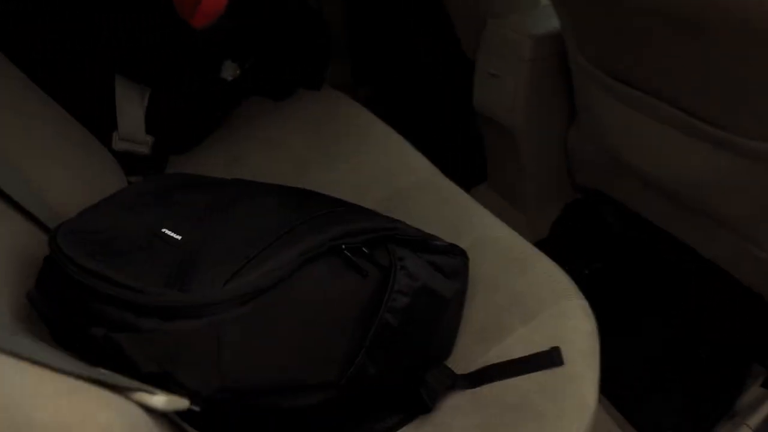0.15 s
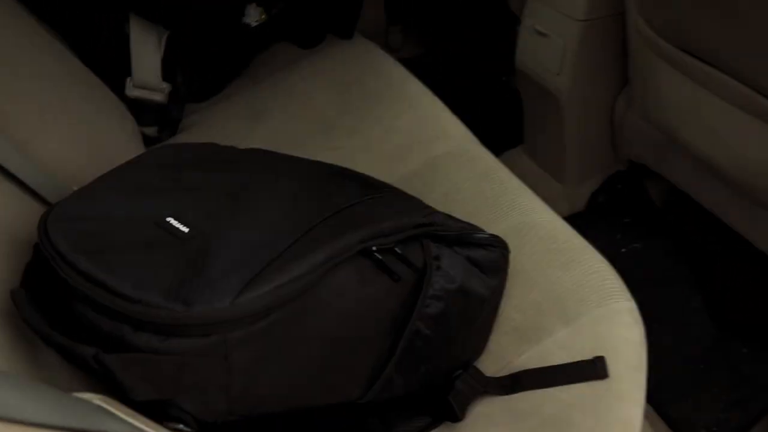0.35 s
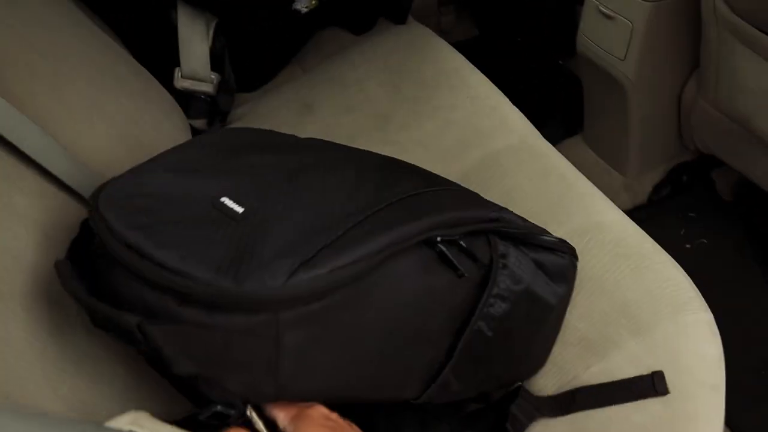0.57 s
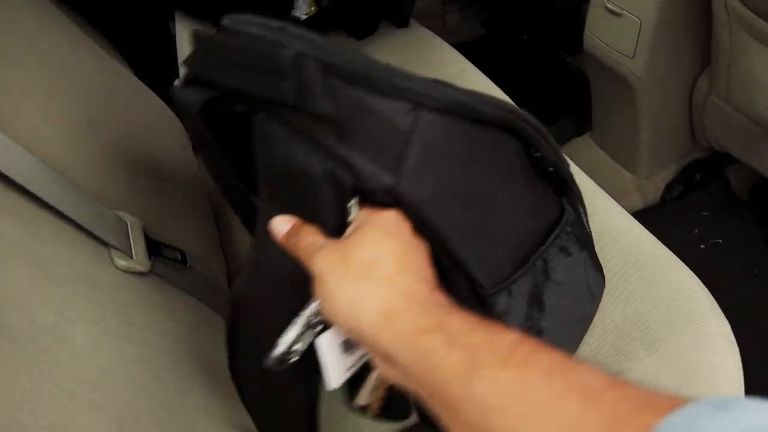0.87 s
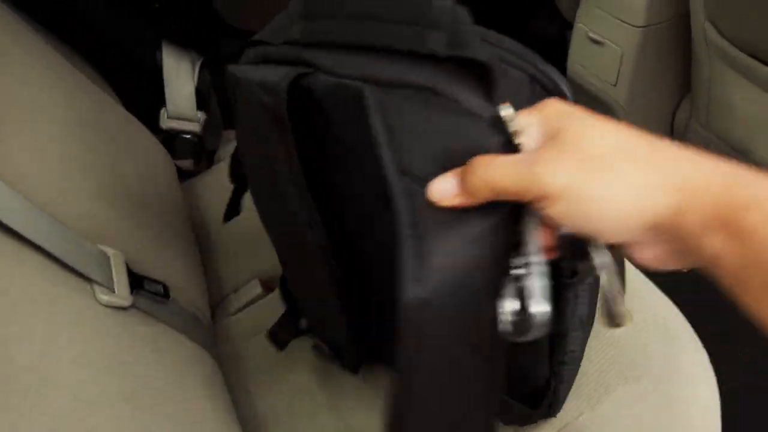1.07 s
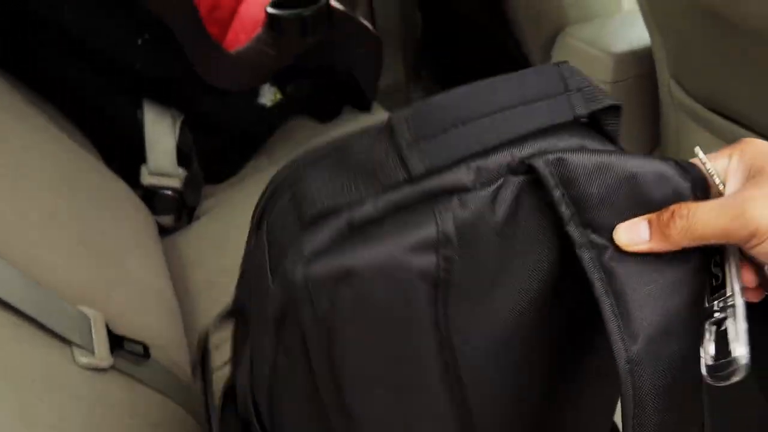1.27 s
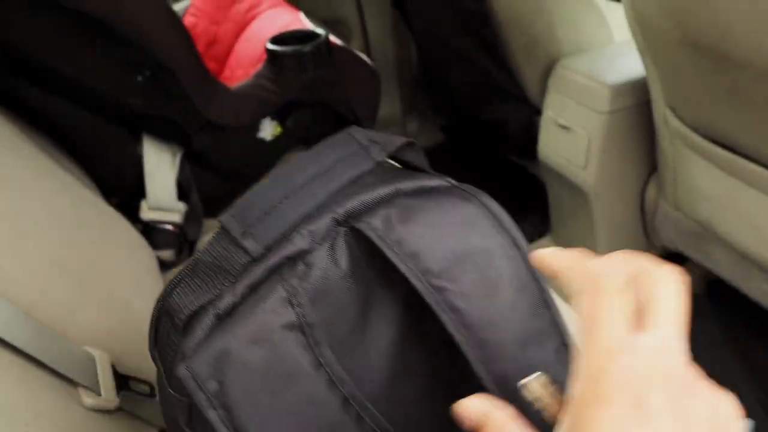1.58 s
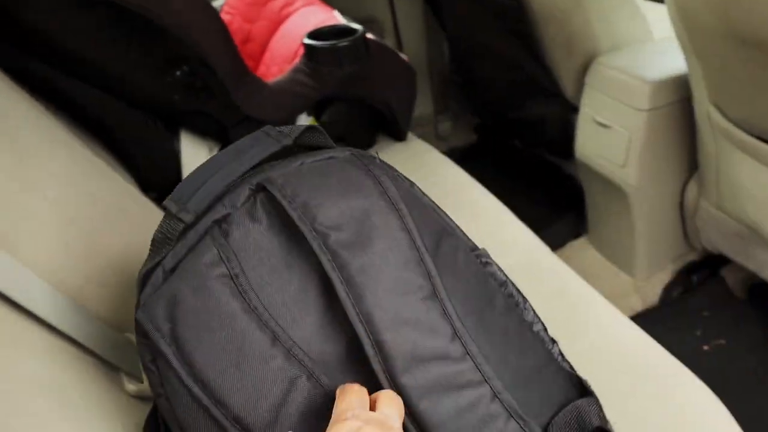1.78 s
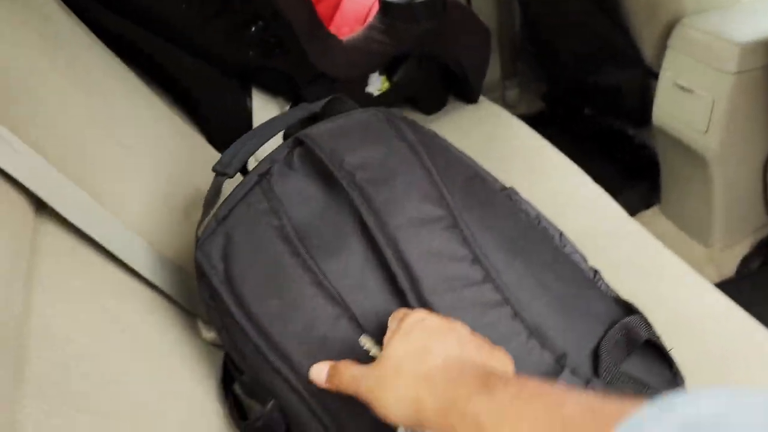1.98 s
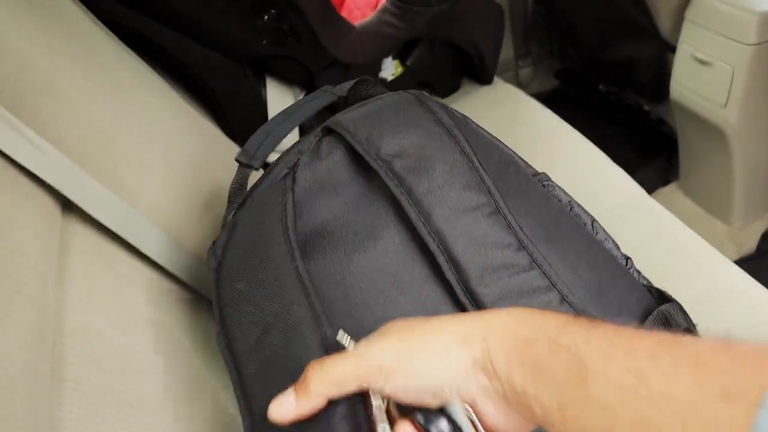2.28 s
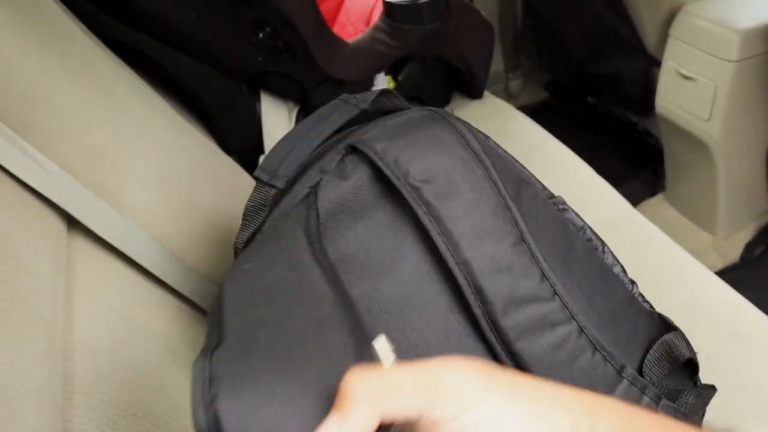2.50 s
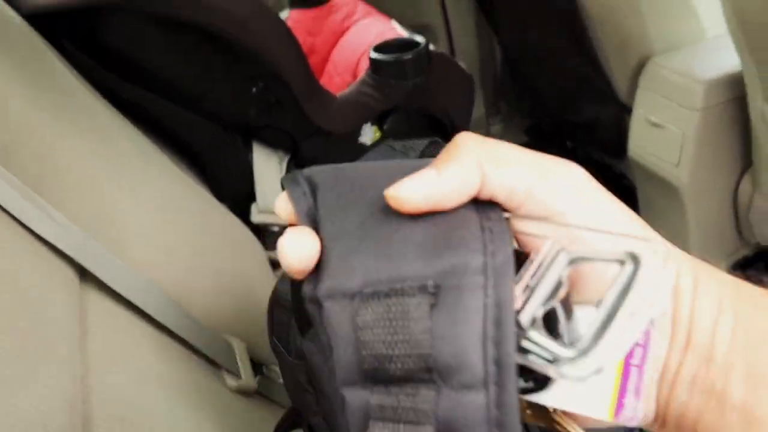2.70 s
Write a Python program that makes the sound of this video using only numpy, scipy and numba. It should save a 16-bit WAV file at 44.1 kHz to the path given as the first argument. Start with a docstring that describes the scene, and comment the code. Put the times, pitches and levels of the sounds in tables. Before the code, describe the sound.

A car door opens very close at 0.22 seconds: a loud, slightly clipped double clunk with bright latch rattle, then a short creak and lesser knocks until 0.7. Keys clack dryly from 0.8, with bright clinks near 1.6, 2.1 and 2.6. A nylon backpack rasps and swishes, bumping the seat around 0.95, 1.37 and 1.8-2.0, with a plastic tap at 1.88. Short dead cabin reflections, faint low outdoor air.

```python
"""Car door, keys and nylon bag

A car door unlatches with a sharp double clunk and creaks open, close to the microphone, outdoors.
A hand that holds a bunch of keys drags a nylon backpack over the seat: keys clink and clack,
damped by the fingers, cloth swishes and crinkles, the bag bumps softly. Hits are decaying modes and
noise bursts, the creak is stick-slip pulses through resonances, cloth and outdoor air are shaped noise."""
import sys
import numpy as np
from scipy import signal
from scipy.fft import rfft, irfft
from scipy.io import wavfile
from scipy.ndimage import uniform_filter1d
from numba import njit

SR = 44100
rng = np.random.default_rng(int(sys.argv[2]) if len(sys.argv) > 2 else 0)


def wav_record(signal):
    """Record a signal, one row per channel, as 16-bit PCM in the file named by sys.argv[1]."""
    frames = np.transpose(np.atleast_2d(signal))
    bounded = np.clip(frames, -1, 1)
    # unit amplitude maps onto the largest positive 16-bit level
    quanta = np.round(bounded * 32767).astype(np.int16)
    wavfile.write(sys.argv[1], SR, quanta)


N = 125685
T = np.arange(N) / SR
HIT_T = T[:SR // 5]  # time within one hit, s


def undb(db):
    """Decibels to gain."""
    return 10 ** (np.asarray(db) / 20)


def unit(x):
    """Scale to rms 1."""
    return x / np.sqrt(np.mean(x ** 2) + 1e-18)


def noise(count=N):
    """White noise."""
    return rng.standard_normal(count)


def curve(rows, axis=1):
    """One column of a table, joined by straight lines in time."""
    rows = np.array(rows)
    return np.interp(T, rows[:, 0], rows[:, axis])


def add(out, at, x):
    """Mix a sound in at a time in seconds."""
    i = max(int(at * SR), 0)
    out[i:i + len(x)] += x[:max(N - i, 0)]


def colour(x, points, tilt_db=0):
    """Give a noise a spectrum and a tilt in dB per octave above 1 kHz; rms 1."""
    hz, db = np.array(points).T
    f = np.fft.rfftfreq(len(x), 1 / SR) + 1
    octaves = np.log2(np.maximum(f / 1000, 1))
    gain_db = np.interp(np.log(f), np.log(hz), db) + tilt_db * octaves
    return unit(irfft(rfft(x) * undb(gain_db), len(x)))


def fade(t60):
    """Exponential decay of a hit, by 60 dB in t60 seconds."""
    return np.exp(-np.log(1000) * HIT_T / max(t60, 1e-3))


def burst(points, t60, tilt_db=0):
    """Dense, quickly dying vibration of a contact."""
    return colour(noise(len(HIT_T)), points, tilt_db) * fade(t60)


def ring(modes, ratio=1, tilt_db=0):
    """Struck modes as decaying sines, tilted in dB per octave about the strongest one."""
    main_hz = max(modes, key=lambda m: m[1])[0]
    out = np.zeros(len(HIT_T))
    for hz, db, t60 in modes:
        level = undb(db + tilt_db * np.log2(hz / main_hz))
        out += level * np.sin(2 * np.pi * hz * ratio * HIT_T) * fade(t60)
    return out


def walk(rate):
    """Smooth random wander, rms 1, with a new target at the given rate per second."""
    k = int(SR / rate)
    steps = np.repeat(noise(N // k + 1), k)
    return unit(uniform_filter1d(steps, k)[:N])


@njit
def resonate(x, hz, width):
    """Band-pass with a moving centre."""
    y, b, l = np.empty(len(x)), 0., 0.  # output, band and low-pass states
    for i in range(len(x)):
        g, k = np.tan(np.pi * hz[i] / SR), width / hz[i]
        v = (b + g * (x[i] + 1e-18 - l)) / (1 + g * (g + k))
        b, l, y[i] = 2 * v - b, l + 2 * g * v, k * v
    return y


def band(x, hz, width):
    """A resonance applied twice, for steep sides; the centre may move."""
    centre = np.ones(len(x)) * hz
    return resonate(resonate(x, centre, width), centre, width)


# Spectrum of the open air. Each row: frequency in Hz, level in dB.
AIR_COLOUR = [(18, -39), (30, -24), (92, 1.5), (472, -8.5), (1200, -7.5), (15000, -33)]
AIR_DB = -48.5


def outdoor_air():
    """Steady outdoor background: noise that is strongest in the bass."""
    return undb(AIR_DB) * colour(noise(), AIR_COLOUR)


CABIN_DB, CABIN_T60_S = -13, 0.063


def cabin(near):
    """Short, dead reflections of the cabin: the sources smeared by a fading noise tail."""
    tail = noise(len(HIT_T)) * fade(CABIN_T60_S) * (HIT_T > .002)
    return undb(CABIN_DB) * signal.fftconvolve(near, tail / np.linalg.norm(tail))[:N]


# Level of the bag's low shuffling. Each row: time in seconds, level in dB.
SHUFFLE = [(.21, -68), (.24, -34.5), (.8, -45.5), (.97, -38.5), (1.14, -49), (1.32, -40.5), (1.38, -27),
           (1.44, -40.5), (1.76, -45.5), (1.88, -32), (2.16, -40.5), (2.56, -38), (2.85, -46)]
# Its spectrum. Each row: frequency in Hz, level in dB.
SHUFFLE_COLOUR = [(25, -40), (50, -12.5), (85, -1.5), (200, -5.5), (350, -14.5), (2000, -50)]


def shuffle():
    """The bulk of the bag shuffles: low noise that follows the drag."""
    return colour(noise(), SHUFFLE_COLOUR) * undb(curve(SHUFFLE))


CRINKLE_RATE_PER_S = 1500  # rms of the uneven catch rate
CRINKLE_SPREAD_DB, CRINKLE_T60_S = 4, 0.0037
CRINKLE_SHARE = 0.53  # share of the friction's power


def friction():
    """Nylon threads catch in clusters of tiny crinkles, over a smooth hiss."""
    draw = rng.random(N)
    chance = unit(undb(5 * walk(40))) * CRINKLE_RATE_PER_S / SR
    catches = (draw < chance) * noise()
    catches *= undb(CRINKLE_SPREAD_DB * np.minimum(rng.exponential(size=N), 2.8))
    # each catch adds a decaying puff of power, filled with noise
    power = signal.fftconvolve(catches ** 2, fade(CRINKLE_T60_S) ** 2)[:N]
    crinkles = np.sqrt(np.abs(power)) * noise()
    return np.sqrt(CRINKLE_SHARE) * unit(crinkles) + np.sqrt(1 - CRINKLE_SHARE) * noise()


# Level of the nylon's rasp before its flutter. Each row: time in seconds, level in dB.
RASP = [(.43, -56), (.48, -42.5), (.72, -51.5), (.87, -52.5), (.93, -40), (1.06, -38), (1.11, -53),
        (1.24, -48), (1.30, -35.5), (1.38, -38), (1.54, -39.5), (1.61, -56.5), (1.775, -49), (1.81, -32.5),
        (1.875, -31), (1.93, -44.5), (2.0, -35), (2.22, -41), (2.49, -35.5), (2.65, -46), (2.78, -46.5),
        (2.85, -54)]
# Level of the fine hiss of sliding cloth. Each row: time in seconds, level in dB.
SWISH = [(.44, -62), (.48, -46), (.78, -49), (1.05, -43.5), (1.11, -58.5), (1.45, -48), (1.49, -41),
         (1.55, -38.5), (1.60, -65), (1.77, -56.5), (1.82, -38), (1.88, -35.5), (1.93, -52.5), (1.99, -43),
         (2.61, -48.5), (2.68, -39.5), (2.85, -64.5)]
# Spectra of the rasp and of the swish. Each row: frequency in Hz, level in dB.
RASP_COLOUR = [(150, -15), (500, 0.5), (1100, -1.5), (4100, 3), (5500, -7), (8000, -13), (12000, -25),
               (16000, -41)]
SWISH_COLOUR = [(1500, -21.5), (4000, -3), (12500, 2.5), (16000, 0)]
FLUTTER_DB = 2.03


def cloth():
    """The same nylon friction is heard as a fluttering rasp and as a bright swish."""
    rubbing = friction()
    rasp_db = curve(RASP) + FLUTTER_DB * walk(81)
    rasp = colour(rubbing, RASP_COLOUR) * undb(rasp_db) * (T > KNOCKS[0][0])
    swish = colour(rubbing, SWISH_COLOUR) * undb(curve(SWISH))
    return rasp + swish


# Fingers on the bag's padding. Each row: centre in seconds, level in dB, pitch in Hz.
RUBS = [(.93, -39, 337), (1.049, -44.5, 474), (1.891, -35.5, 430), (2.266, -35.5, 473), (2.5, -38.5, 520)]
RUB_SPREAD_S, RUB_WIDTH = 0.02, 0.6  # filter width as a share of the pitch


def finger_rubs():
    """Fingers rub the padding: narrow noise that swells and sinks."""
    out = np.zeros(N)
    for at, db, hz in RUBS:
        swell = np.exp(-.5 * ((T - at) / RUB_SPREAD_S) ** 2)
        out += undb(db) * unit(band(noise(), hz, RUB_WIDTH * hz)) * swell
    return out


# The bag bumps the seat. Each row: start in seconds, level in dB, pitch in Hz.
BUMPS = [(.945, -21, 140), (1.373, -11, 116.5), (1.791, -17.5, 171), (1.868, -21, 344), (1.895, -21, 267),
         (2.008, -24.5, 265), (2.068, -24.5, 163), (2.513, -27, 135)]
BUMP_T60_S, BUMP_ATTACK_S = 0.061, 0.004
BUMP_RUSTLE_DB, BUMP_WIDTH = -5, 1.5  # filter width as a multiple of the pitch


def bag_bumps():
    """The soft bag thuds on the seat: a low damped tone with a rustle and a blunt attack."""
    out = np.zeros(N)
    attack = np.minimum(HIT_T / BUMP_ATTACK_S, 1)
    for at, db, hz in BUMPS:
        thud = ring([(hz, 0, BUMP_T60_S)])
        rustle = unit(band(noise(len(HIT_T)), hz, BUMP_WIDTH * hz)) * fade(BUMP_T60_S)
        add(out, at, undb(db) * (thud + undb(BUMP_RUSTLE_DB) * rustle) * attack)
    return out


# Plastic buckles and the key tag. Each row: start in seconds, level in dB, pitch in Hz.
TAPS = [(1.0450, -17, 1700), (1.056, -21, 920), (1.3698, -17, 1310), (1.8809, -8.5, 2104),
        (2.4892, -23.5, 835), (2.7603, -21, 1480)]
# Modes of a plastic part. Each row: multiple of its pitch, level in dB, t60 in seconds.
PLASTIC = [(.72, -9.5, 0.014), (1, 0.5, 0.013)]
TAP_CRACK_DB = -11.5


def plastic_taps():
    """Plastic parts tap: two short modes and a crack of contact noise."""
    out = np.zeros(N)
    for at, db, hz in TAPS:
        crack = burst(CONTACT_COLOUR, PLASTIC[0][2], tilt_db=-2)
        add(out, at, undb(db) * (ring(PLASTIC, hz) + undb(TAP_CRACK_DB) * crack))
    return out


# Stick-slip of the opening door. Each row: time in seconds, slips per second before jitter,
# level in dB, resonance ratio.
CREAK = [(.31, 119, -59, 0.82), (.335, 118, -26, 0.92), (.40, 89, -34, 0.83), (.435, 90, -62, 0.67),
         (.48, 122, -34, 1.07), (.55, 170, -35.5, 0.87), (.632, 175, -27, 1.084), (.647, 108, -35, 0.99),
         (.665, 136, -26.5, 1.065), (.678, 125, -56, 1)]
# Resonances that the creak rings. Each row: frequency in Hz before the ratio, filter width in Hz,
# level in dB.
HINGE = [(463, 187, 8), (660, 183, 7.5), (810, 147, 10), (1250, 360, -1.5), (1800, 250, -5.5),
         (3900, 880, -9)]
SLIP_JITTER, SLIP_SPREAD_DB = .07, 2  # jitter as a share of the slip rate
SCUFF_S, SCUFF_DB = .0015, -19  # decay time constant, level


def creak():
    """Uneven slips, each with a short scuff, ring resonances that glide as the door swings."""
    rate = curve(CREAK) * np.exp(SLIP_JITTER * walk(150))
    phase = np.cumsum(rate) / SR
    slips = np.diff(np.floor(phase), prepend=0) * undb(SLIP_SPREAD_DB * noise())
    since_slip = (phase % 1) / rate
    scuff = undb(SCUFF_DB) * noise() * np.exp(-since_slip / SCUFF_S)
    ratio = curve(CREAK, axis=3)
    body = sum(undb(db) * band(slips + scuff, hz * ratio, width) for hz, width, db in HINGE)
    moving = (T > CREAK[0][0]) * (T < CREAK[-1][0])
    return unit(body) * undb(curve(CREAK, axis=2)) * moving


# Knocks in the door panel. Each row: start in seconds, level in dB, pitch ratio.
KNOCKS = [(0.2236, 0, 1.), (.2340, -5, 0.99), (0.2406, -7.5, 1.28), (0.3078, -3, 0.78), (.3210, -12, 1.2),
          (0.3998, -19, .7), (0.4685, -22.5, 1.24), (0.5102, -9, 1)]
# Modes of the door panel. Each row: frequency in Hz before the ratio, level in dB, t60 in seconds.
PANEL = [(178, -9, 0.083), (453, -10, 0.035), (571, 3, 0.024), (756, -8.5, 0.028), (1164, -6, 0.022),
         (1630, -10.5, 0.0085), (3060, -6.5, 0.0075)]
PANEL_CRACK_DB, PANEL_CRACK_T60_S, PANEL_LOW_HZ = -9.5, 0.015, 175


def door_panel():
    """Each knock cracks and rings the panel's modes; the panel radiates little bass."""
    out = np.zeros(N)
    for at, db, ratio in KNOCKS:
        crack = undb(PANEL_CRACK_DB) * burst(CONTACT_COLOUR, PANEL_CRACK_T60_S, tilt_db=-6)
        add(out, at, undb(db) * (crack - 0.55 * ring(PANEL, ratio)))
    return signal.sosfilt(signal.butter(3, PANEL_LOW_HZ, "high", fs=SR, output="sos"), out)


# The latch springs free and rattles. Each row: start in seconds, level in dB, t60 in seconds.
LATCH = [(0.2254, -4.5, 0.019), (0.2269, -11.5, 0.023), (0.2353, -24, 0.017), (0.244, -15.5, 0.019),
         (0.2504, -28, 0.02)]
# Spectrum of the latch. Each row: frequency in Hz, level in dB.
LATCH_COLOUR = [(200, -22), (1500, -1), (3100, -13), (3850, 2.5), (4700, -10), (6000, -7), (7200, -22),
                (10500, -4.5), (12000, -13.5), (16000, -36)]


def latch():
    """The latch snaps and rattles: short bursts of bright noise."""
    out = np.zeros(N)
    for at, db, t60 in LATCH:
        add(out, at, undb(db) * burst(LATCH_COLOUR, t60))
    return out


# Keys clack together. Each row: start in seconds, level in dB, treble tilt in dB per octave, t60 in
# seconds of the contact noise.
CLACKS = [(0.08, -39.5, 6.5, 0.033), (0.8214, -23.5, 4, 0.012), (0.8289, -28.5, 1.5, 0.033),
          (0.8357, -19, 4, 0.02), (0.9402, -23.5, 4, 0.014), (1.3474, -21, -1, 0.018),
          (1.673, -29, 6, 0.013), (1.726, -35.5, 4.5, 0.036), (1.8082, -11.5, 5, 0.0081),
          (2.3413, -17, 1.5, 0.023), (2.3493, -19, 3.5, 0.022), (2.4982, -16, -2.5, 0.005),
          (2.5416, -15.5, 2.5, 0.014), (2.5473, -24.5, 2, 0.024), (2.5777, -14.5, 3.5, 0.037),
          (2.801, -24, 4, 0.035)]
# Spectrum of hard contacts, also for clinks, taps and knocks. Each row: frequency in Hz, level in dB.
CONTACT_COLOUR = [(200, 2.5), (700, -2), (1400, 2.5), (3000, 0.5), (4000, 0), (6000, -5.5), (9500, -10.5),
                  (13000, -19), (16000, -28)]
# Modes of the bunch. Each row: frequency in Hz, level in dB, t60 in seconds.
BUNCH = [(2390, -11, 0.042), (3900, -9.5, 0.054), (4800, -15.5, 0.063)]


def key_clacks():
    """Keys clack dryly: contact noise with the bunch's modes, slightly detuned each time."""
    out = np.zeros(N)
    for at, db, tilt, t60 in CLACKS:
        contact = burst(CONTACT_COLOUR, t60, tilt)
        bunch = ring(BUNCH, 1 + 0.016 * rng.standard_normal(), tilt)
        add(out, at, undb(db) * (contact + bunch))
    return out


# Small keys and the key ring. Each row: start in seconds, level in dB, pitch in Hz.
PINGS = [(0.5716, -25.5, 10150), (0.584, -27, 9710), (0.9392, -21, 8970), (1.1614, -20.5, 4620),
         (1.606, -21, 12300), (2.5767, -14.5, 9230), (2.5795, -24, 9700), (2.802, -24, 12600)]
PING_T60_S = 0.029


def key_pings():
    """Small metal parts ping: one high tone with narrow-band chatter around it."""
    out = np.zeros(N)
    for at, db, hz in PINGS:
        chatter = unit(band(noise(len(HIT_T)), hz, 0.078 * hz)) * fade(PING_T60_S)
        add(out, at, undb(db) * (ring([(hz, 0, PING_T60_S)]) + undb(-9) * chatter))
    return out


# One key rings. Each row: start in seconds, level in dB, contact noise in dB relative to that level.
CLINKS = [(2.801, -25.5, -9), (1.1612, -20.5, -5.5), (1.243, -25, -13), (2.153, -31, -12),
          (2.5416, -24, -14), (1.6069, -8, -12), (2.055, -26, -17), (2.108, -11.5, -20),
          (2.1124, -17.5, -10), (2.5779, -17.5, -0.5), (2.7679, -32.5, -8)]
# Modes of that key. Each row: frequency in Hz, level in dB, t60 in seconds before the grip.
KEY = [(4700, -15, .028), (4967, 1.5, 0.053), (5230, -14, .018), (9960, -8, 0.019)]
CONTACT_T60_S, CONTACT_TILT_DB = 0.038, 5.5  # tilt per octave
KEY_BUILD_S, KEY_GRIP_S, KEY_BUZZ = 0.00038, 0.012, 0.23  # buzz: spread of the log level


def key_clinks():
    """A struck key's modes build up, buzz, and are choked by the fingers."""
    out = np.zeros(N)
    build = -np.expm1(-HIT_T / KEY_BUILD_S)
    grip = np.exp(-np.square(HIT_T / KEY_GRIP_S))
    for at, db, contact_db in CLINKS:
        tone = ring(KEY, 1 + 0.0016 * rng.standard_normal())
        buzz = np.exp(KEY_BUZZ * walk(700)[:len(HIT_T)])
        contact = burst(CONTACT_COLOUR, CONTACT_T60_S, CONTACT_TILT_DB)
        add(out, at, undb(db) * (tone * buzz * build * grip + undb(contact_db) * contact))
    return out


def scene():
    """All sources with the reflections of the cabin, over the outdoor air."""
    door = door_panel() + latch() + creak()
    keys = key_clinks() + key_pings() + key_clacks()
    bag = plastic_taps() + bag_bumps() + finger_rubs() + cloth() + shuffle()
    near = door + keys + bag
    return (near + cabin(near) + outdoor_air())[None]


CLIP_LEVEL, TOP_HZ = 1., 16000


def record(dry):
    """Peaks beyond full scale clip, then a steep low-pass cuts the top."""
    clipped = np.clip(dry, -CLIP_LEVEL, CLIP_LEVEL)
    return signal.sosfilt(signal.ellip(8, .2, 80, TOP_HZ, fs=SR, output="sos"), clipped)


dry = scene()
out = record(dry)
wav_record(out)
```